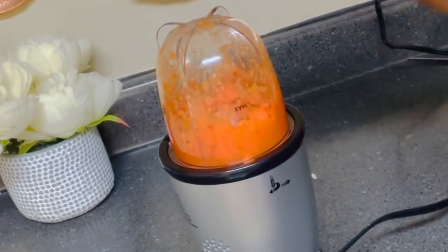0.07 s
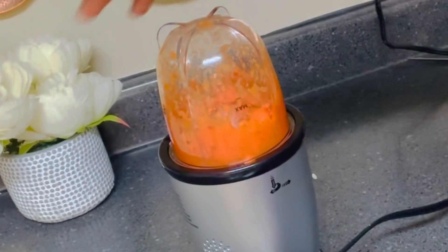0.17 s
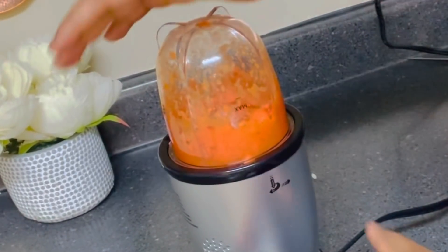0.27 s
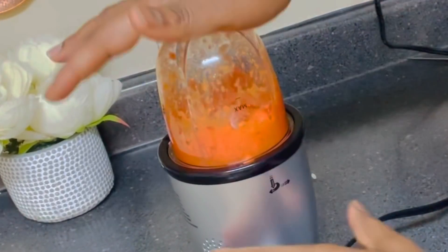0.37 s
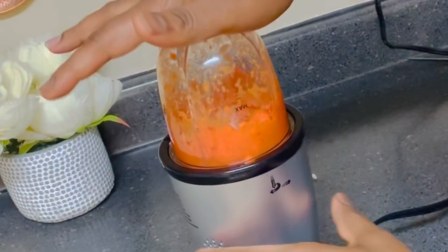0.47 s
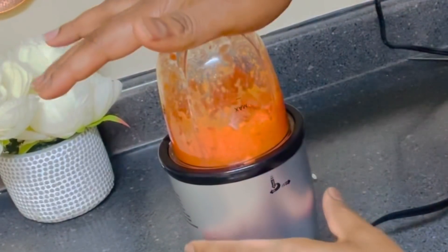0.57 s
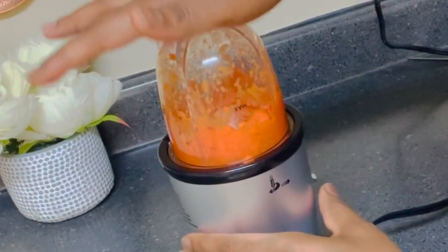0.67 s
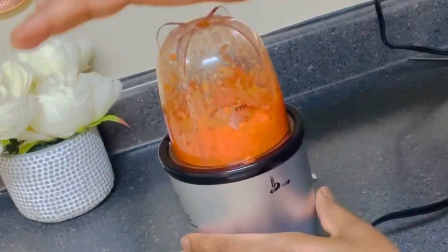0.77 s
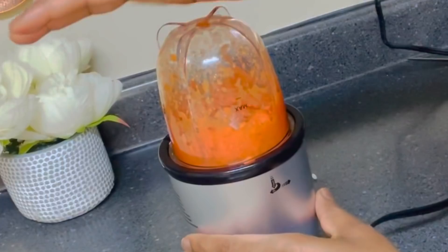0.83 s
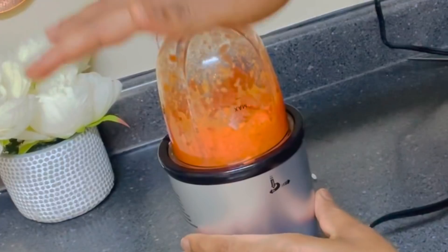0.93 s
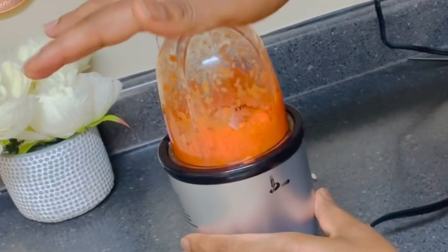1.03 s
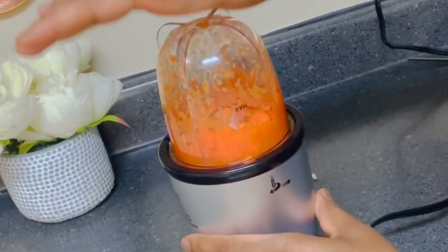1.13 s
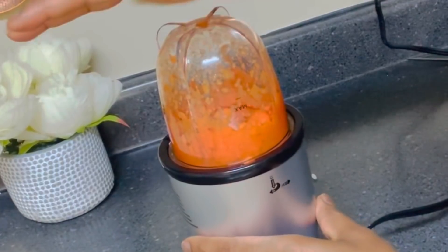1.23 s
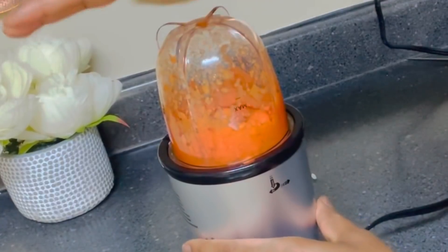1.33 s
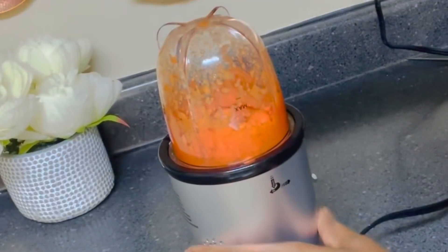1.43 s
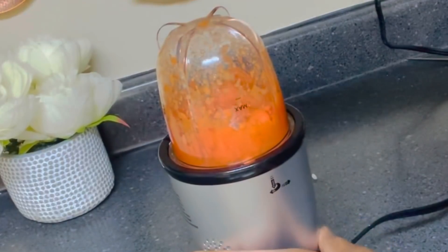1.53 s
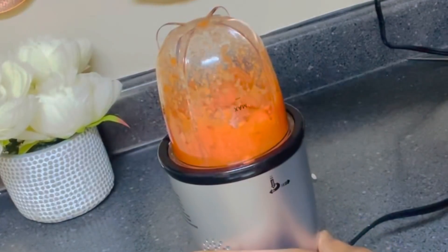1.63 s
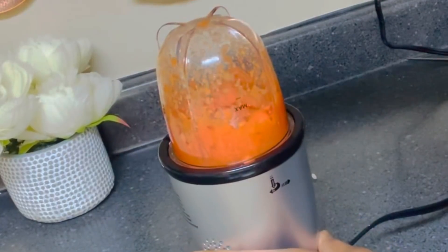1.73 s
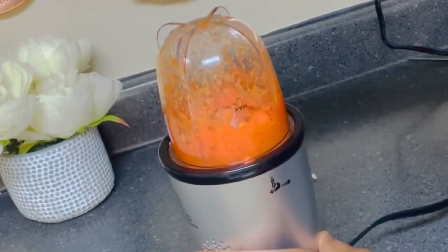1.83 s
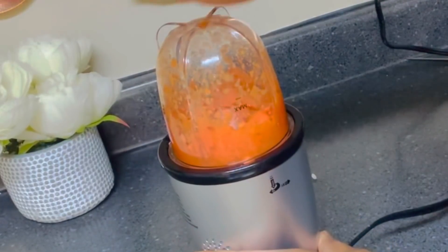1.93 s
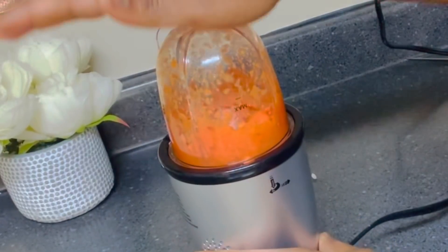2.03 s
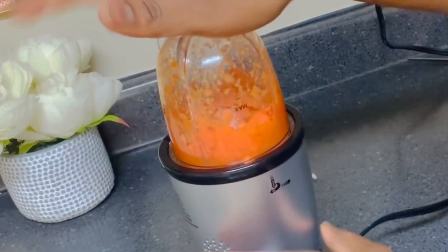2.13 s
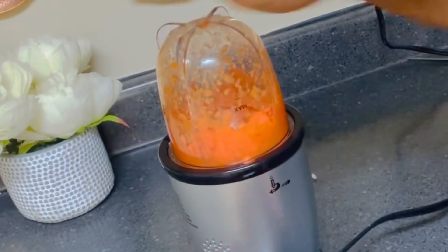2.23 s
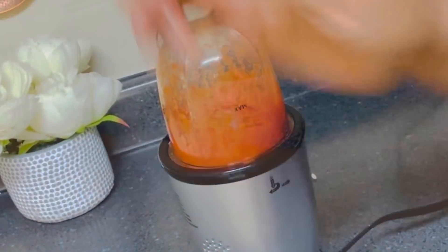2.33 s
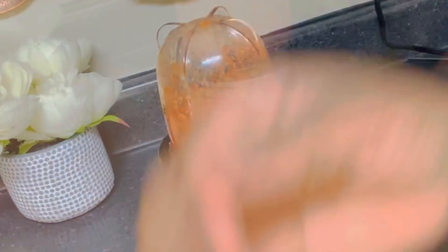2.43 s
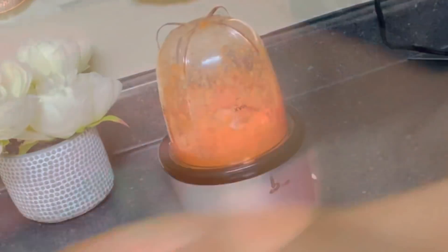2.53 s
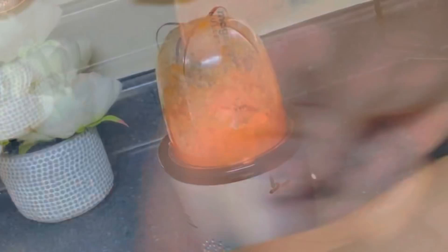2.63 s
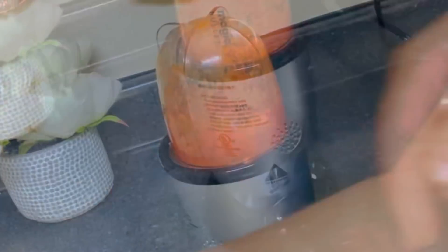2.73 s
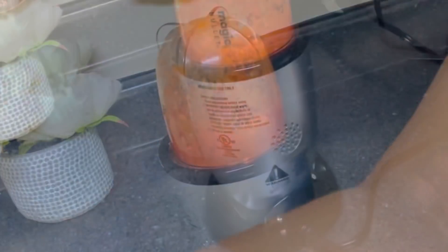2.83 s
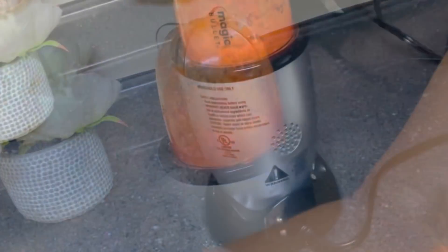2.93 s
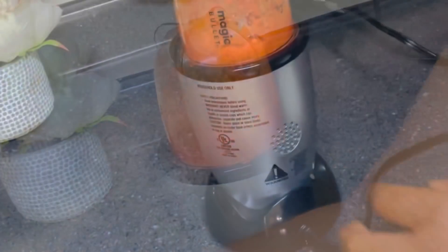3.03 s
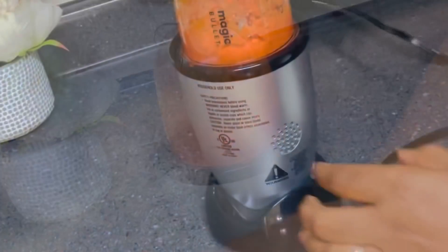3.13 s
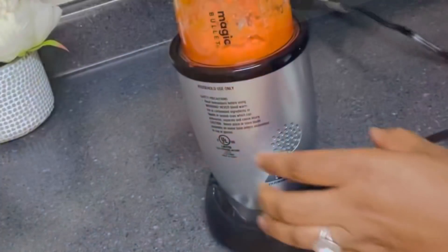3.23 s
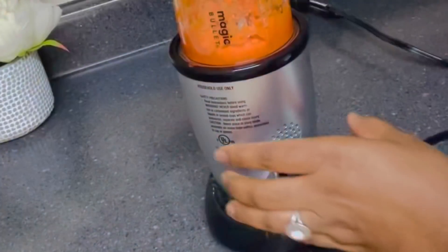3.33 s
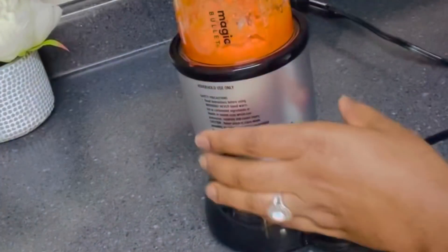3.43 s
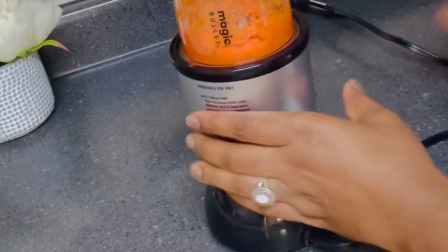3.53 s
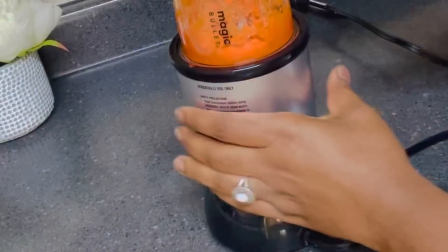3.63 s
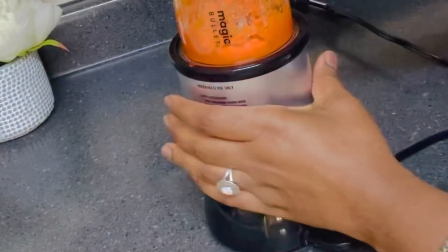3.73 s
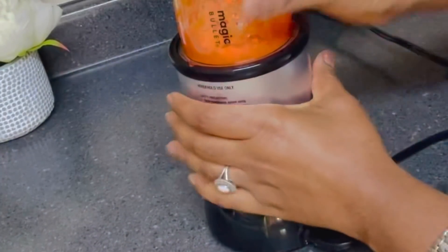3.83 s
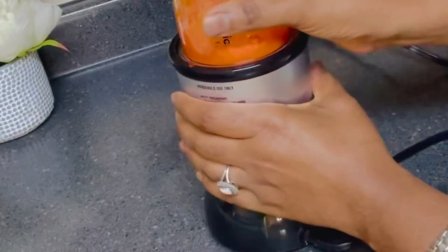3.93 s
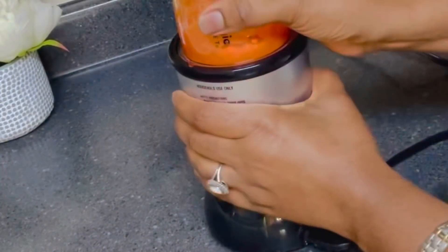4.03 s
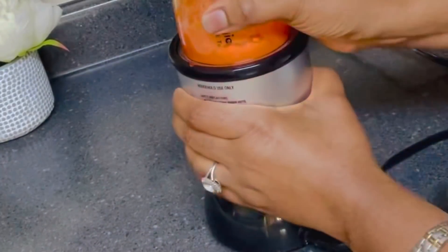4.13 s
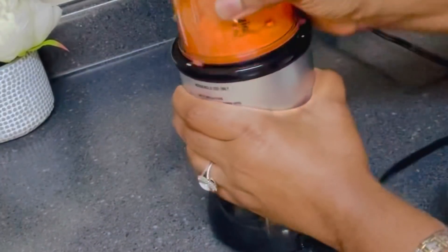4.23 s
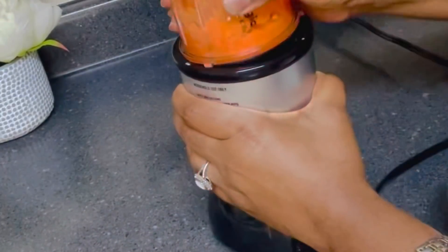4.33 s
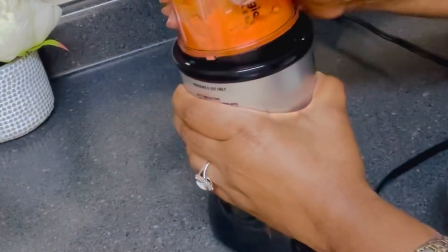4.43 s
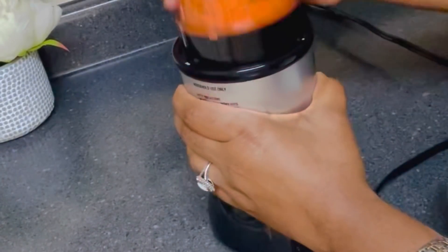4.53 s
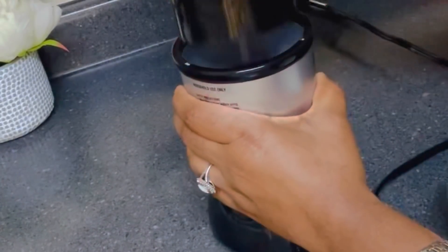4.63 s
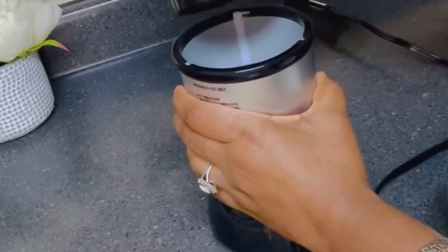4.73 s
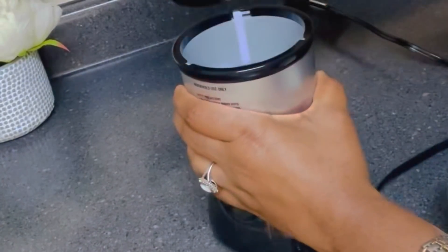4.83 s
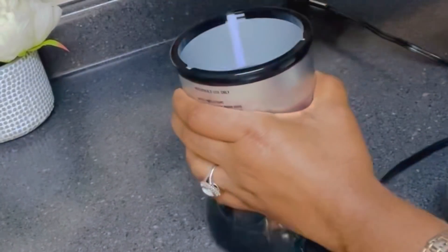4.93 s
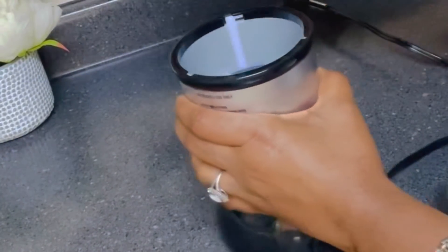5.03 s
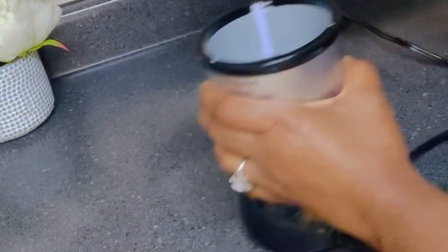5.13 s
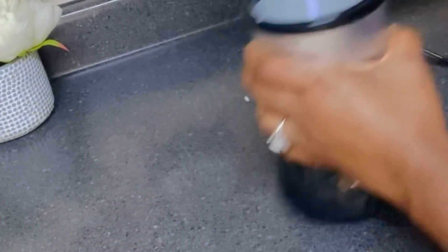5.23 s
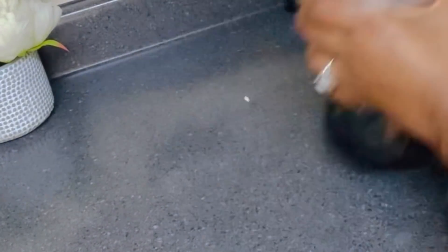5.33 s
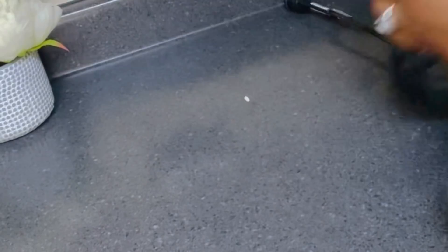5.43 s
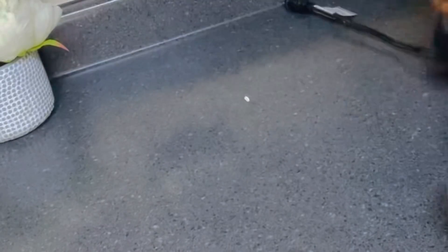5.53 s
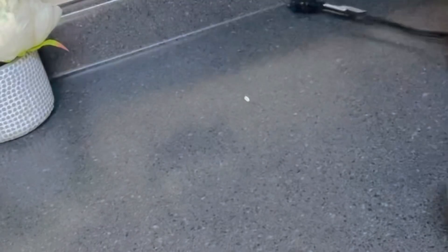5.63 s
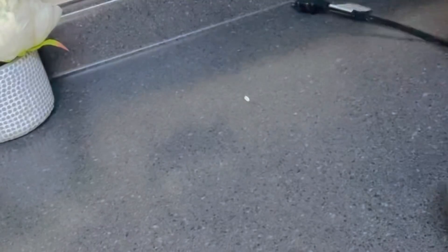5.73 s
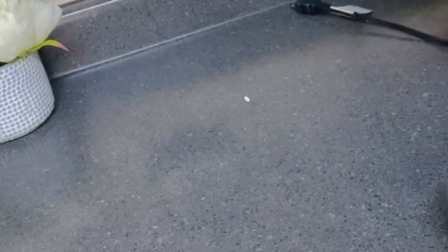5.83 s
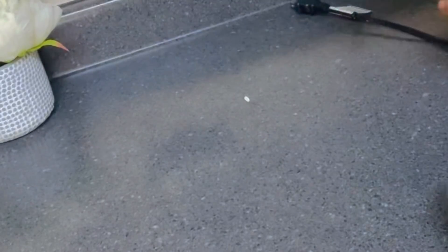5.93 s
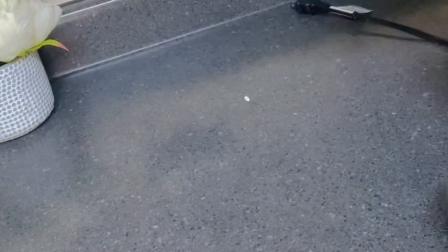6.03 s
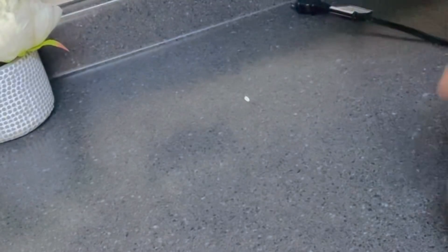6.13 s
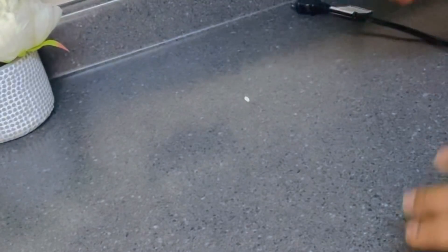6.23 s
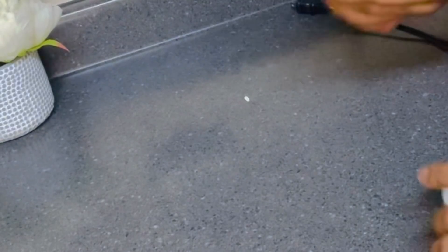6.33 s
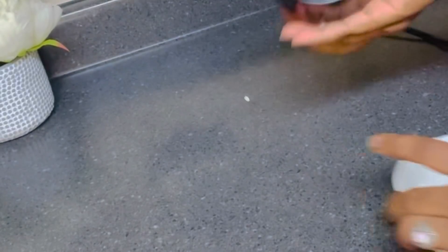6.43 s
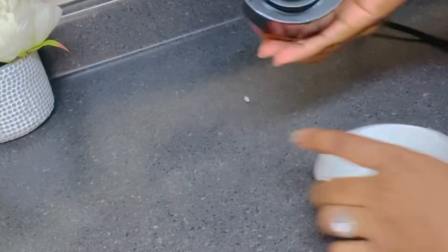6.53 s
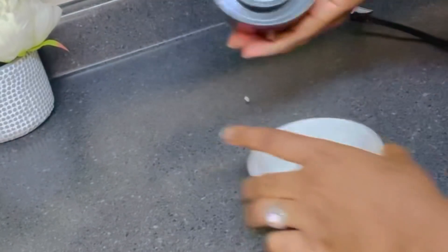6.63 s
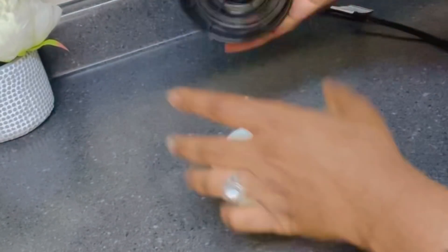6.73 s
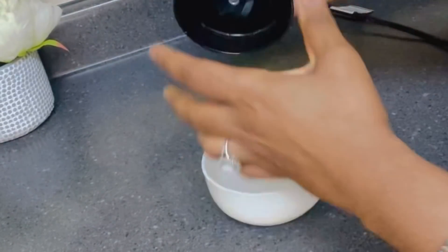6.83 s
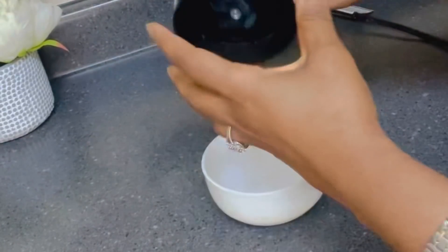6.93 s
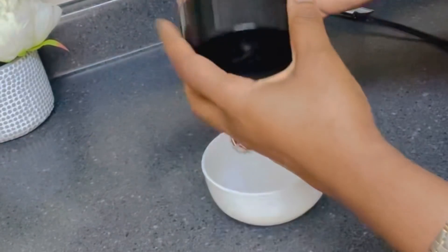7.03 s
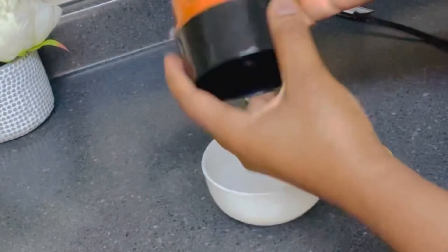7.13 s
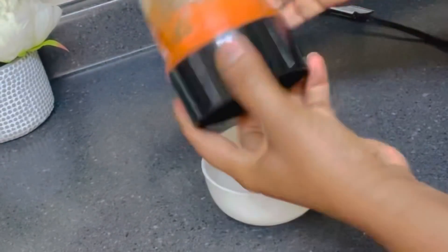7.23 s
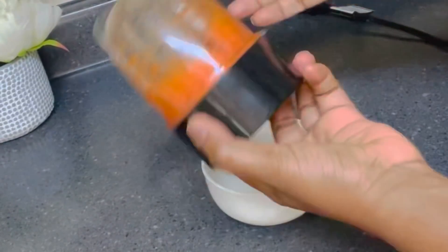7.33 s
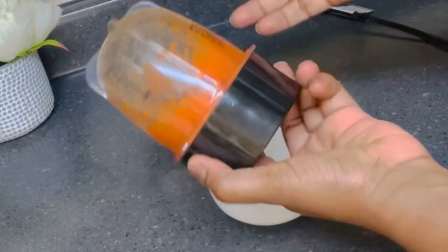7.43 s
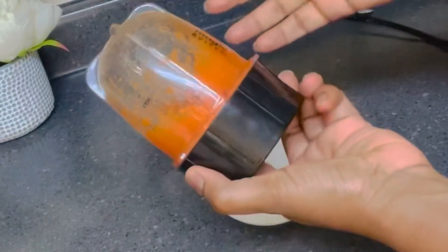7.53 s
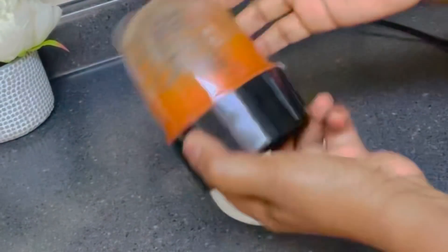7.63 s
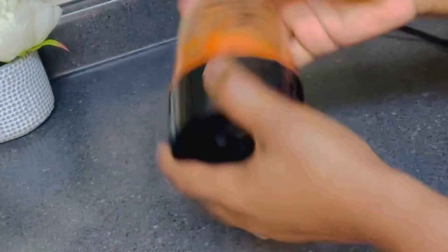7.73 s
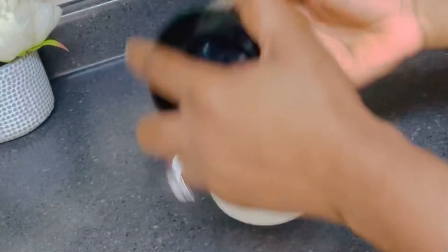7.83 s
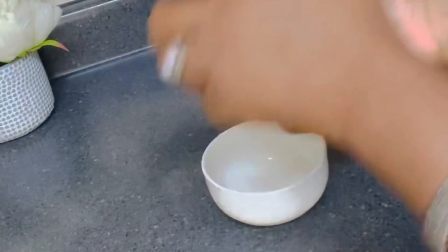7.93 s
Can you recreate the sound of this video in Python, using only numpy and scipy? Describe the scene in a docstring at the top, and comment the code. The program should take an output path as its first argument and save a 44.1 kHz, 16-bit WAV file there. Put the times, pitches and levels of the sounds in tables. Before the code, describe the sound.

A small blender whirs loudly, cuts out with a hard plastic clatter, then its cup is twisted off, knocked down, and a bowl scrapes in.

```python
"""A small blender whirs on a stone counter over mains hum and room noise: coloured noise, wavering tones and whines.
Near 3 s it fades amid plastic contacts, a singing metal ring and its base being dragged: noise bursts, modes, grit.
The cup is twisted off with clicks and knocks, then cup and base are set down with booms and thuds.
A ceramic bowl slides in on stuttering resonant noise and sings as it stops; last come a few plastic ticks.
Faint rustle and squeaks slip in between, and the kitchen answers the plastic contacts and the counter blows."""
import sys
import numpy as np
from scipy import signal
from scipy.fft import rfft, irfft, next_fast_len
from scipy.io import wavfile
from scipy.ndimage import uniform_filter1d, map_coordinates

SR = 44100
rng = np.random.default_rng(int(sys.argv[2]) if len(sys.argv) > 2 else 0)


def wav_record(signal):
    """Record a signal, one row per channel, as 16-bit PCM in the file named by sys.argv[1]."""
    frames = np.transpose(np.atleast_2d(signal))
    bounded = np.clip(frames, -1, 1)
    # unit amplitude maps onto the largest positive 16-bit level
    quanta = np.round(bounded * 32767).astype(np.int16)
    wavfile.write(sys.argv[1], SR, quanta)


def boost(x):
    """Linear amplitude factor 10**(x/20) for a level x in decibels (scalar or array-like)."""
    u = np.asarray(x, float) / 20
    return 10 ** u


N = 352359

# the motor runs, then fades [t/s, housing drone level/dB, blade hiss level/dB]
MOTOR_LEVELS = [(0.0, -29, -25.5), (1.19, -27.5, -26), (2.08, -28.5, -26), (2.36, -28.5, -26.5),
                (2.87, -36.5, -35), (2.98, -38.5, -35.5), (3.12, -43, -44.5), (3.3, -64.5, -61)]
# drone colour [f/Hz, relative density/dB]
DRONE_COLOUR = [(30, -49.5), (55, -18), (100, -26.5), (160, -23), (300, -20), (340, -16), (520, -3.5),
                (680, -13.5), (750, -18), (800, -12.5), (900, -10), (990, -18.5), (1060, -16.5),
                (1400, -12.5), (2200, -40.5)]
# blade hiss colour [f/Hz, relative density/dB]
HISS_COLOUR = [(1000, -32), (1800, -2.5), (2200, -11), (2600, -1), (3150, -9), (3480, -10), (3650, -5.5),
               (4000, -10), (4500, -8.5), (6500, -11.5), (9000, -9.5), (11500, -20.5), (16000, -27.5)]
# housing resonances [f/Hz, width/Hz, level/dB]
HOUSING_PEAKS = [(204.8, 6.2, 17), (452, 4.8, 1.5), (1425, 30, 5), (1543, 29, 8), (1910, 51, -1),
                 (2083, 18, 10.5), (2120, 50, 5), (2140, 20, 11.5), (2370, 22, 7), (2480, 20, 3.5),
                 (2750, 21, 7), (2880, 18, 6), (2834, 79, 3), (3015, 24, 5.5), (3065, 34, 7), (3300, 36, 9),
                 (3356, 81, 7.5), (3580, 27, 7.5), (3740, 83, 2.5), (3820, 25, 1.5), (4117, 49, 5),
                 (6370, 140, 3)]
# shaft and mains tones [f/Hz, level/dB before a common lift, slow coming and going/dB]
MOTOR_TONES = [(120.3, -52, 2.5), (239.7, -61, 3), (354.7, -46.5, 3), (709, -41.5, 1.5), (822, -46.5, 1.5),
               (946, -44, 1), (7240, -51.5, 1)]
# the beating core of the drone [t/s, f/Hz, level/dB against the drone]
ROAR_PATH = [(0.0, 510.5, -13.5), (0.5, 522, -3.5), (1.1, 503, -7.5), (1.8, 505.3, -6.5),
             (2.3, 528.5, -3.5), (3.3, 534.4, -9)]
# a fuzzy whine of drifting pitch [t/s, f/Hz, level/dB against the blade hiss]
WHINE_PATH = [(0.0, 2600, -21), (0.4, 2586, -5.5), (1.0, 2577, -10.5), (1.5, 2570, -11.5), (2.0, 2580, -10),
              (2.4, 2606, -10), (3.3, 2580, -9)]
# a faint high line [t/s, f/Hz, level/dB against the blade hiss]
WHISTLE_PATH = [(0.0, 10400, -25.5), (0.3, 10800, -24.5), (1.2, 10640, -26), (3.3, 10700, -31)]
# the cup buzzes in its seat, strongest bursts [t/s, level/dB against the blade hiss]
SEAT_BURSTS = [(1.496, 0), (1.59, -5), (1.687, -6), (1.83, -8)]
# resonances of the cup's seat [f/Hz, width/Hz, level/dB]
SEAT_PEAKS = [(3400, 260, 0.5), (3830, 900, 4)]
# half length of every burst; mean gap and level of the weaker ones
BURST_HALF_S, WEAK_GAP_S, WEAK_DB = 0.012, 0.14, -11

# mains hum [f/Hz, level/dB]
MAINS_TONES = [(60, -64), (119.5, -72.5), (200, -70)]
# room noise colour [f/Hz, relative density/dB]
ROOM_COLOUR = [(15, -53.5), (25, -21.5), (48, 3), (71, 1.5), (87, -20.5), (112, -6.5), (278, -11),
               (386, -15), (636, -16), (674, -17.5), (1350, -34), (1700, -41.5), (2500, -71), (3250, -88.5),
               (5500, -120)]
ROOM_START_DB, ROOM_RISE_DB_PER_S = -60, 1.01

# plastic contacts [t/s, rattle level/dB, brighter crack level/dB]
PLASTIC_CONTACTS = [(2.974, -3, -29), (3.012, -5, -35.5), (3.139, -11.5, -45.5), (3.146, 2, -29),
                    (3.199, -14, -37), (3.228, -17, -39.5), (3.931, -43.5, -51), (4.065, -34, -43.5),
                    (4.09, -30, -44.5), (4.148, -24, -46.5), (4.154, -13, -29.5), (4.17, -10, -18.5),
                    (4.189, -17, -24.5), (4.161, -6, -13), (4.18, -9, -25), (4.196, -13, -22.5),
                    (4.44, -46, -55.5), (4.466, -35.5, -57.5), (4.552, -38, -59), (5.343, -31, -65),
                    (5.375, -21.5, -32.5), (5.456, -19, -37.5), (5.462, -14.5, -19.5), (5.4645, -1, -16.5),
                    (5.649, -21, -46.5), (5.675, -15, -40.5), (5.682, -21.5, -47), (5.689, -20, -49),
                    (5.696, -21, -50), (5.723, -24, -56), (5.827, -35.5, -66), (5.85, -45, -61),
                    (7.641, -28.5, -44.5), (7.886, -29, -75), (7.891, -36, -70), (7.896, -16.5, -44),
                    (7.902, -16, -52), (7.928, -23, -55)]
# broad plastic resonances [f/Hz, width/Hz, level/dB]
PLASTIC_PEAKS = [(777, 530, -1), (1214, 680, -0.5), (1800, 500, -2), (2600, 700, -4), (4094, 3800, -5.5)]
TICK_T60_S, TICK_RISE_S = 0.022, 0.0016
# rebounds of each contact: mean gap, level of the first, further loss for each next
CHATTER_GAP_S, CHATTER_DB, CHATTER_LOSS_DB = 0.0098, -15, 14.5
# weight landing on the counter [t/s, deep boom level/dB, slab thud level/dB, hollow knock level/dB]
COUNTER_BLOWS = [(2.976, -49, -33, -30), (3.15, -46, -30.5, -31), (4.152, -55.5, -37, -29),
                 (4.159, -38, -20, -14.5), (4.169, -56, -34, -23), (4.179, -47, -25.5, -15.5),
                 (4.188, -59, -34.5, -21), (4.205, -58, -26.5, -27), (4.228, -34.5, -25.5, -54),
                 (4.282, -37, -40, -62), (4.946, -53.5, -31, -52), (5.343, -68, -60, -51),
                 (5.467, -43, -24.5, -20), (5.509, -38.5, -35, -34), (5.686, -60, -37, -36.5),
                 (5.7, -49, -17.5, -33.5), (5.739, -23.5, -43, -50), (5.884, -40, -70, -78),
                 (7.641, -51.5, -54, -63.5)]
# modes of the cabinet below [f/Hz, level/dB, t60/s]
CABINET_MODES = [(52.7, 4, 0.22), (73.2, -1.5, 0.22)]
# modes of the counter slab [f/Hz, level/dB, t60/s]
SLAB_MODES = [(99, -8, 0.12), (135, 1, 0.09), (196, -7.5, 0.15), (219, 1, 0.047)]
# modes of the hollow cup [f/Hz, level/dB, t60/s]
CUP_MODES = [(279.4, -5.5, 0.1), (344, -6, 0.095), (365, -2.5, 0.061), (436, -0.5, 0.035), (499, 5, 0.034),
             (567, -5.5, 0.061), (670, -10.5, 0.061), (896, -8, 0.031)]
# decay of the kitchen's answer [f/Hz, t60/s]
KITCHEN_DECAY = [(60, 1), (260, 0.43), (1800, 0.49), (5000, 0.44), (14000, 0.3)]

# a metal ring touches the base [t/s, level/dB]
RING_CLINKS = [(3.03, -52), (3.147, -43), (3.235, -56)]
# modes of the metal ring [f/Hz, level/dB, t60/s]
RING_MODES = [(6019, 9, .42), (6031, 3, .3), (8662, 0, .3), (10030, -8, .4), (10450, -3, .3),
              (11400, -12, .25), (14200, -6, .2)]
# the ring's lower note, a low hum in the base, the bowl as it stops [t/s, f/Hz, level/dB, t60/s, swell/s]
SINGLE_NOTES = [(3.205, 4624, -44, .6, .01), (3.205, 4636, -48, .55, .01), (3.35, 198, -45, .5, .05),
                (6.69, 1960, -53.5, .48, .04), (6.69, 1969, -61, .48, .04)]

# rubbing on stone, colour [f/Hz, relative density/dB]
STONE_COLOUR = [(200, 4.5), (600, 10), (2500, 8.5), (4500, -1), (8000, -14.5), (16000, -56)]
DRAG_START_S, DRAG_DB, DRAG_HOLD_S, DRAG_FADE_DB_PER_S = 3.146, -33, 0.081, 118.5
JOLT_DB, JOLT_S = 8, 0.005  # extra level as the base breaks loose, and its time constant

# clean blows on the hard shell [t/s, level/dB]
SHELL_SNAPS = [(3.148, -18), (3.1995, -25.5), (3.231, -31), (5.4647, -28.5), (7.8968, -26), (7.9015, -29.5)]
# modes of the shell [f/Hz, level/dB, t60/s]
SHELL_MODES = [(1130, -3, 0.022), (1254, -1.5, 0.0076), (1400, -0.5, 0.014), (1633, -8, 0.017),
               (2350, -1.5, 0.01), (4320, -17.5, 0.028)]
# faint mid-band rustle and dying room sound [t/s, level/dB]
RUSTLE_LEVELS = [(3.2, -78), (3.5, -77.5), (4.05, -72.5), (4.5, -72), (4.62, -83.5), (4.87, -78.5),
                 (5.24, -78), (5.43, -62.5), (5.95, -76), (7.42, -79.5), (7.83, -75), (7.99, -72)]
# rustle colour [f/Hz, relative density/dB]
RUSTLE_COLOUR = [(700, -20), (1500, -4), (2300, -5.5), (3200, -4), (4500, -10), (8000, -16.5), (16000, -34)]
# brief faint narrow sounds [middle t/s, length/s, f/Hz, width/Hz, level/dB]
SQUEAK_BANDS = [(3.32, 0.08, 651, 40, -50), (3.79, 0.069, 5460, 500, -76.5), (5.204, 0.099, 1750, 200, -75),
                (5.232, .06, 2700, 780, -72), (6.41, 0.036, 2640, 120, -50.5), (6.455, .05, 4000, 150, -60),
                (6.668, .04, 2350, 88, -65), (7.357, 0.12, 1576, 31, -76)]
# the cup's tabs click in their slots [t/s, level/dB]
TAB_CLICKS = [(3.93, -52), (4.064, -68), (4.088, -54), (4.468, -71), (4.549, -69)]
# modes of the tabs [f/Hz, level/dB, t60/s]
TAB_MODES = [(1790, -4, .035), (2510, -3, 0.025), (2910, -2, 0.03), (3330, -3, 0.025)]

# the bowl slides [t/s, rumble level/dB, fine grit level/dB]
SLIDE_LEVELS = [(6.25, -85, -85), (6.296, -47.5, -55.5), (6.4, -40, -49.5), (6.42, -32, -49),
                (6.45, -36, -48.5), (6.465, -30, -51), (6.545, -29, -47), (6.572, -39, -45.5),
                (6.63, -43.5, -50.5), (6.702, -47, -54.5), (6.9, -71, -92)]
# resonances of the bowl's walls [f/Hz, width/Hz, level/dB]
BOWL_PEAKS = [(143, 120, -9.5), (248, 58, -7), (363.4, 70, -1), (450, 47, -1), (575, 93, 1),
              (756, 90, -1.5), (1006, 140, -8.5), (1325, 77, -5), (1616, 110, -11)]
# ringing ceramic glaze [f/Hz, width/Hz, level/dB]
GLAZE_PEAKS = [(7440, 20, 16), (11714, 30, 11)]
# the bowl's foot catches [t/s, level/dB]
FOOT_CATCHES = [(6.302, -34.5), (6.406, -23), (6.418, -14.5), (6.459, -7), (6.476, -10), (6.494, -9.5),
                (6.512, -17), (6.529, -13.5), (6.538, -8), (6.564, -22)]
CATCH_T60_S = 0.013
STUTTER_DB, STUTTER_PER_S = 0.5, 40  # its foot grips unevenly
BOWL_LEAN_DB = -1  # left against right: the bowl sits to the right

# left-right likeness of diffuse sound [f/Hz, likeness from 0 to 1]
LIKENESS = [(60, 0.86), (130, 1), (290, 0.63), (640, 0.68), (1400, 0.83), (3000, 0.32), (4400, 0.59),
            (5500, 0.89), (7500, 0.26)]
# two microphone ports hear by different paths [f/Hz, left lag/half turns]
PORT_LAG = [(100, 0.037), (300, 0.25), (700, 0.34), (1400, 0.32), (3700, 0.49), (4400, 0.64), (5000, 0.56),
            (7500, 0.54)]
# stereo treble: bands heard almost only in the sum or only in the difference of the channels
# [f/Hz, left lag/half turns]
TREBLE_STEREO_BANDS = [(8150, .8), (8300, 1), (9550, 1), (9700, 1.35), (10900, 1.5), (11050, 2), (12300, 2),
                       (12450, 2.4), (13000, 2.5), (13200, 3)]
# tilt between the ports [f/Hz, left minus right level/dB]
PORT_LEAN = [(60, -1), (200, 0.5), (380, 0.5), (700, -3.5), (1300, -0.5), (4400, -1.2)]
# each microphone's own hiss [f/Hz, level/dB]
MIC_HISS = [(1000, -98), (4000, -92), (9000, -79), (12000, -100), (16000, -100)]


def unit(x):
    """Scaled to rms 1."""
    return x / np.sqrt(np.mean(x ** 2) + 1e-20)


def along(points, hz):
    """Reads (f/Hz, value) points on a log frequency axis."""
    f, v = np.transpose(points)
    return np.interp(np.log(hz + 1), np.log(f + 1), v)


def gains(rows):
    """A gain per sample for each level column; -120 dB outside the rows."""
    s, *columns = np.transpose(rows)
    t = np.arange(N) / SR
    return [boost(np.interp(t, s, db, left=-120, right=-120)) for db in columns]


def wobble(rate):
    """A smooth random curve with this many knots a second."""
    knots = rng.standard_normal(int(N * rate / SR) + 4)
    return map_coordinates(knots, [np.arange(N) * rate / SR])


def filtered(x, response):
    """x shaped by a complex response of frequency."""
    m = next_fast_len(N + SR // 2)
    return irfft(rfft(x, m) * response(np.fft.rfftfreq(m, 1 / SR)), m)[..., :N]


def resonances(peaks, f):
    """Causal response of (f/Hz, width/Hz, level/dB) resonances, of alternating sign."""
    return sum((-1) ** k * boost(db) * 1j * f * width / (hz * hz - f * f + 1j * f * width)
               for k, (hz, width, db) in enumerate(peaks))


def narrowed(pair, colour=lambda hz: 1):
    """Mixes two unrelated sounds into a left and right of set likeness, made identical above about 8 kHz."""
    turn = lambda hz: np.arccos(np.clip(along(LIKENESS + [(8300, 1)], hz), -1, 1)) / 2
    mid, side = filtered(pair, lambda hz: colour(hz) * np.array([np.cos(turn(hz)), np.sin(turn(hz))]))
    return np.array([mid + side, mid - side])


def rush(colour, grain_db=0, grain_rate=300, patchy_db=0):
    """Stereo noise of rms 1, lumpy at the grain rate, with time-frequency patches of random gain."""
    z = signal.stft(rng.standard_normal((2, N)), nperseg=512)[2]
    field = uniform_filter1d(rng.standard_normal(z.shape[1:]), size=4, axis=0)
    field = uniform_filter1d(field, size=10, axis=1)
    pair = signal.istft(z * boost(patchy_db * unit(field)), nperseg=512)[1][:, :N]
    return unit(narrowed(pair * boost(grain_db * wobble(grain_rate)), colour))


def strike(times, levels_db, modes, attack, scatter_db):
    """Each blow rings decaying sine modes, at newly scattered strengths; attack is a time constant in s."""
    out, t = np.zeros(N + SR), np.arange(SR) / SR
    hz, mode_db, t60 = np.transpose(modes)
    decay = boost(mode_db[:, None] - 60 * t / t60[:, None])
    rings = decay * np.sin(2 * np.pi * hz[:, None] * t) * (1 - np.exp(-t / attack))
    luck = boost(scatter_db * rng.standard_normal((len(times), len(modes))))
    for s, db, share in zip(times, levels_db, luck):
        out[round(s * SR):][:SR] += boost(db) * share @ rings
    return out[:N]


def whine(rows, flutter_per_s):
    """A slowly moving pitch, smeared into a narrow band by random complex flutter."""
    s, hz, db = np.transpose(rows)
    t = np.arange(N) / SR
    flutter = np.array([wobble(flutter_per_s) + 1j * wobble(flutter_per_s) for port in range(2)])
    carrier = np.exp(2j * np.pi * np.cumsum(np.interp(t, s, hz)) / SR)
    return boost(np.interp(t, s, db)) * unit(narrowed((flutter * carrier).real))


def shaft_tones():
    """Tones that share one slightly unsteady speed, each with its own slow and fast level wander."""
    turns = 2 * np.pi * np.cumsum(1 + 0.004 * wobble(8)) / SR
    lines = np.zeros(N)
    for hz, db, fade_db in MOTOR_TONES:
        level = boost(db + fade_db * wobble(4) + 3.2 * wobble(30))
        lines += level * np.sqrt(2) * np.sin(hz * turns + rng.uniform(0, 2 * np.pi))
    return boost(30.5) * lines


def seat_buzz():
    """The cup buzzes in its seat: short bursts of resonant noise, strong ones among weaker random ones."""
    t = np.arange(N) / SR
    weak = np.cumsum(WEAK_GAP_S * rng.uniform(0.5, 1.5, 24))
    all_bursts = SEAT_BURSTS + [(s, WEAK_DB) for s in weak]
    bursts = sum(boost(db) * np.exp(-((t - s) / BURST_HALF_S) ** 4) for s, db in all_bursts)
    return bursts * unit(filtered(rng.standard_normal(N), lambda hz: resonances(SEAT_PEAKS, hz)))


def motor():
    """Brush and blade noise through the housing, with shaft tones, whines and the buzz of the cup."""
    drone, hiss = gains(MOTOR_LEVELS)
    body = lambda hz: np.sqrt(1 + sum(np.abs(resonances([peak], hz)) ** 2 for peak in HOUSING_PEAKS))
    churn_db = 0.6 * wobble(9)  # pulp slaps the blades unevenly
    low = boost(churn_db) * rush(lambda hz: boost(along(DRONE_COLOUR, hz)) * body(hz),
                               grain_db=0.94, grain_rate=60, patchy_db=0.7)
    high = boost(0.16 * churn_db) * rush(lambda hz: boost(along(HISS_COLOUR, hz)) * body(hz),
                                       grain_db=0.5, grain_rate=430, patchy_db=1.5)
    low_part = low + shaft_tones() + whine(ROAR_PATH, flutter_per_s=90)
    high_part = high + seat_buzz() + whine(WHINE_PATH, flutter_per_s=45) + whine(WHISTLE_PATH, flutter_per_s=60)
    return drone * low_part + hiss * high_part


def mains_hum():
    """An appliance hums: steady sines with gently wandering levels."""
    t = np.arange(N) / SR
    return sum(boost(db + 2.2 * wobble(6)) * np.sqrt(2) * np.sin(2 * np.pi * hz * t) for hz, db in MAINS_TONES)


def room_noise():
    """Low, lumpy room noise whose level is raised steadily throughout."""
    level = boost(ROOM_START_DB + ROOM_RISE_DB_PER_S * np.arange(N) / SR)
    return level * rush(lambda hz: boost(along(ROOM_COLOUR, hz)), grain_db=1.3, grain_rate=15)


def ticks():
    """Hard contacts and their rebounds: a rattle through broad plastic resonances and a brighter crack.
    Row 0 is the sound itself, row 1 the same energy as one even push, which is what the walls return."""
    rattle, crack, t = np.zeros((2, N + SR)), np.zeros((2, N + SR)), np.arange(SR // 10) / SR
    shape = boost(-60 * t / TICK_T60_S) * (1 - np.exp(-t / TICK_RISE_S))
    noise = shape * rng.standard_normal((len(PLASTIC_CONTACTS), 4, 2, len(t)))
    delays = np.cumsum(CHATTER_GAP_S * rng.uniform(0.5, 1.5, (len(PLASTIC_CONTACTS), 3)), axis=1)
    push = np.linalg.norm(shape) * (t == 0)
    losses_db = [0] + [CHATTER_DB - CHATTER_LOSS_DB * k for k in range(3)]  # contact, then three rebounds
    for (s, rattle_db, crack_db), sounds, later in zip(PLASTIC_CONTACTS, noise, delays):
        for at, loss_db, (dull, bright) in zip([s, *(s + later)], losses_db, sounds):
            start = round(at * SR)
            rattle[:, start:][:, :len(t)] += boost(rattle_db + loss_db) * np.array([dull, push])
            crack[:, start:][:, :len(t)] += boost(crack_db + loss_db) * np.array([bright, push])
    edge = signal.butter(2, [3400, 10500], "band", fs=SR, output="sos")
    body = lambda hz: resonances(PLASTIC_PEAKS, hz) / (1 + 1j * hz / 5000) ** 2  # dulled above 5 kHz
    return filtered(rattle[:, :N], body) + signal.sosfilt(edge, crack[:, :N])


def blows():
    """Landing weight rings three sets of modes: the cabinet booms, the slab thuds, the hollow cup knocks."""
    s, boom_db, thud_db, knock_db = np.transpose(COUNTER_BLOWS)
    boom = strike(s, boom_db, CABINET_MODES, attack=0.0027, scatter_db=1.5)
    thud = strike(s, thud_db, SLAB_MODES, attack=0.0038, scatter_db=4)
    knock = strike(s, knock_db, CUP_MODES, attack=0.003, scatter_db=3)
    return boom + thud + knock


def kitchen(x):
    """The room's answer: noise tails, redrawn each quarter second, dying at a speed set by frequency."""
    out, step = np.zeros((2, N + 2 * SR)), SR // 4
    for at in range(0, N, step):
        hz, t, z = signal.stft(rng.standard_normal((2, SR // 2)), SR, nperseg=256)
        decay = boost(-60 * t / along(KITCHEN_DECAY, hz)[:, None])
        tail = signal.istft(z * decay, SR, nperseg=256)[1]
        wet = signal.fftconvolve(x[None, at:at + step], tail / np.linalg.norm(tail[0]), axes=1)
        start = at + 180  # the answer comes 4 ms late
        out[:, start:start + wet.shape[1]] += wet
    return narrowed(out[:, :N])


def ringing():
    """The metal ring, the base and the bowl sing on as decaying sines."""
    clinks = strike(*np.transpose(RING_CLINKS), RING_MODES, attack=0.0007, scatter_db=1.5)
    notes = sum(strike([s], [db], [(hz, 0, t60)], attack=swell, scatter_db=1)
                for s, hz, db, t60, swell in SINGLE_NOTES)
    return clinks + notes


def stone(hz):
    """Amplitude colour of rubbing on stone."""
    return boost(along(STONE_COLOUR, hz))


def base_drag():
    """The base breaks loose with a jolt, then rubs as grainy stone noise and dies away."""
    since = np.arange(N) / SR - DRAG_START_S
    jolt_db = JOLT_DB * np.exp(-np.abs(since) / JOLT_S)
    fade_db = DRAG_FADE_DB_PER_S * np.clip(since - DRAG_HOLD_S, 0, None)
    return (since > 0) * boost(DRAG_DB + jolt_db - fade_db) * rush(stone, grain_db=1.5, grain_rate=56)


def snaps():
    """Single clean blows ring the short, hard modes of the shell."""
    return strike(*np.transpose(SHELL_SNAPS), SHELL_MODES, attack=0.00028, scatter_db=4.5)


def rustle():
    """Faint mid-band rustle and dying room sound: patchy, grainy noise on a drawn level curve."""
    noise = rush(lambda hz: boost(along(RUSTLE_COLOUR, hz)), grain_db=1.2, grain_rate=29, patchy_db=1.5)
    return gains(RUSTLE_LEVELS)[0] * noise


def squeaks():
    """Short narrow bands of noise, heard as a short mid-pitched tone, a puff or a thin squeak."""
    t, out = np.arange(N) / SR, np.zeros(N)
    for s, length, hz, width, db in SQUEAK_BANDS:
        band = filtered(rng.standard_normal(N), lambda f: resonances([(hz, width, 0)], f) ** 2)
        out += boost(db) * np.exp(-(2 * (t - s) / length) ** 4) * unit(band)
    return out


def tab_clicks():
    """The cup's tabs click in their slots, ringing small plastic modes."""
    return strike(*np.transpose(TAB_CLICKS), TAB_MODES, attack=0.00056, scatter_db=6)


def bowl_slide():
    """The foot stutters and catches on the stone; the bowl's walls and glaze ring along."""
    walls = lambda hz: resonances(BOWL_PEAKS, hz)
    rumble, grit = gains(SLIDE_LEVELS)
    stutter = boost(STUTTER_DB * wobble(STUTTER_PER_S))
    bowl = stutter * rumble * rush(walls, grain_db=1.5, grain_rate=90, patchy_db=1.8)
    catches, t = np.zeros(N), np.arange(300) / SR
    for s, db in FOOT_CATCHES:  # each a short judder
        catches[round(s * SR):][:300] += boost(db - 60 * t / CATCH_T60_S) * rng.standard_normal(300)
    bright = lambda hz: (stone(hz) + np.abs(resonances(GLAZE_PEAKS, hz))) * hz / (hz + 1500)
    glaze = grit * rush(bright, grain_db=0.5, grain_rate=270, patchy_db=3.0)
    return (bowl + filtered(catches, walls) + glaze) * boost(np.array([[0.5], [-0.5]]) * BOWL_LEAN_DB)


def scene():
    """All sources; the ticks and blows also wake the room, which answers little of the bass."""
    hits, pushes = ticks() + blows()
    airborne = filtered(pushes, lambda hz: 1j * hz / (450 + 1j * hz))
    steady = motor() + mains_hum() + room_noise()
    contacts = hits + boost(-5.5) * kitchen(airborne) + ringing() + snaps() + tab_clicks()
    return steady + contacts + base_drag() + rustle() + squeaks() + bowl_slide()


def top_cut(x):
    """Nothing passes above the cut-off."""
    return signal.sosfilt(signal.butter(12, 15980, fs=SR, output="sos"), x)


def record(dry):
    """Two ports hear the scene with a lag and lean that change with pitch, lose the deep bass and add hiss.
    Besides this, above about 8 kHz the treble lies in bands heard almost only in the channel sum or only in the
    channel difference."""
    lean = lambda hz: boost(along(PORT_LEAN + [(8000, 0)], hz) / 2)
    lag = lambda hz: np.exp(-0.5j * np.pi * along(PORT_LAG + TREBLE_STEREO_BANDS, hz))
    half = lambda hz: lean(hz) * lag(hz)  # each channel takes half the difference
    low_cut = lambda hz: 1 / (1 + (42 / (hz + 1)) ** 8)
    heard = filtered(dry, lambda hz: low_cut(hz) * np.array([half(hz), 1 / half(hz)]))
    hiss = filtered(rng.standard_normal((2, N)), lambda hz: boost(along(MIC_HISS, hz)))
    return top_cut(heard + hiss)


dry = scene()
out = record(dry)
wav_record(out)
```